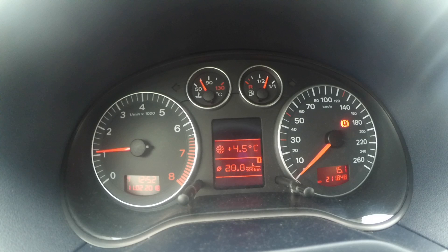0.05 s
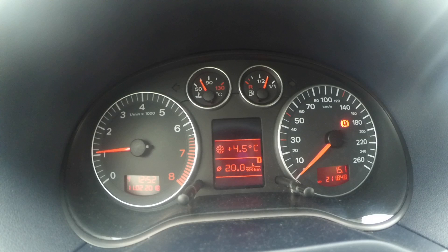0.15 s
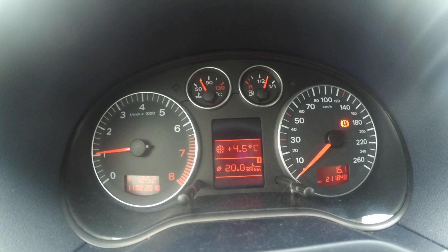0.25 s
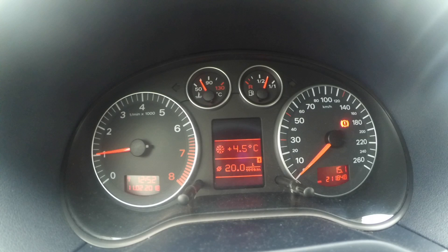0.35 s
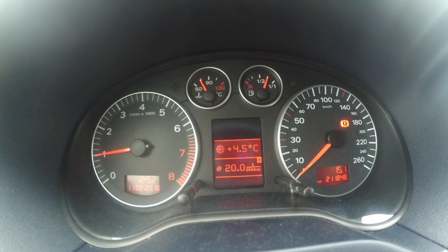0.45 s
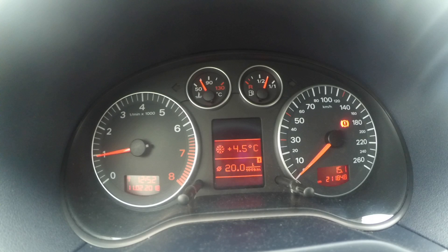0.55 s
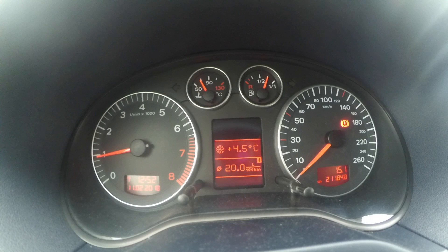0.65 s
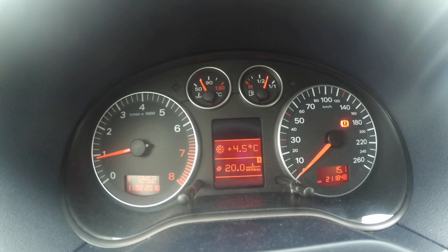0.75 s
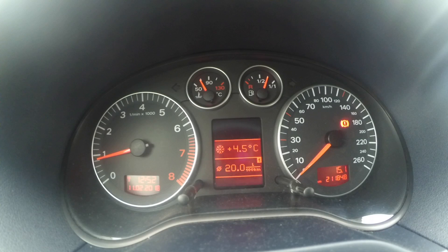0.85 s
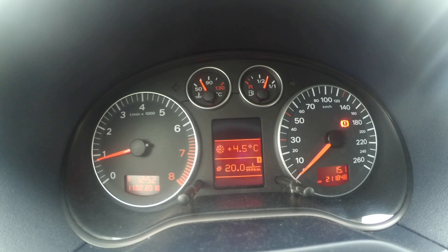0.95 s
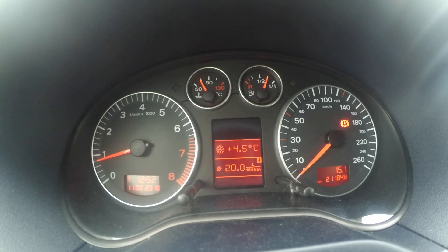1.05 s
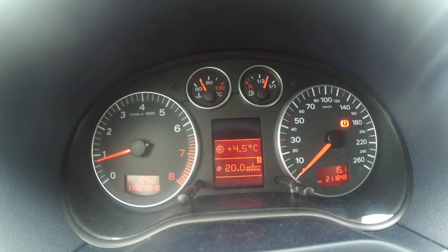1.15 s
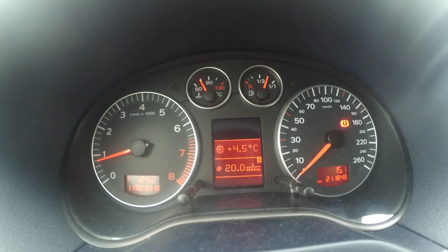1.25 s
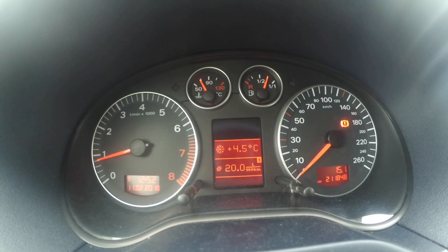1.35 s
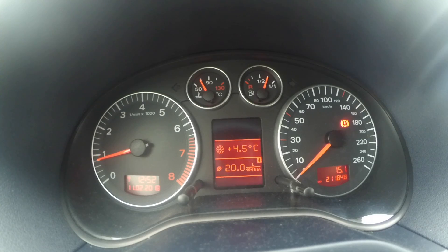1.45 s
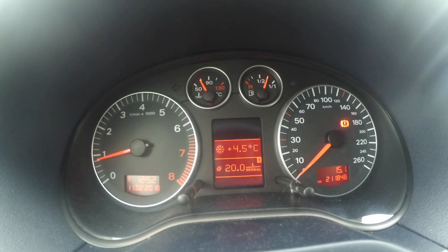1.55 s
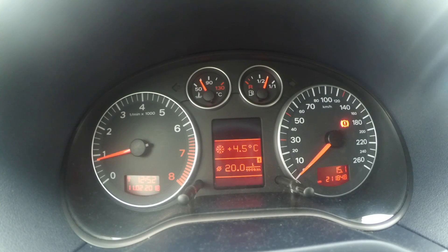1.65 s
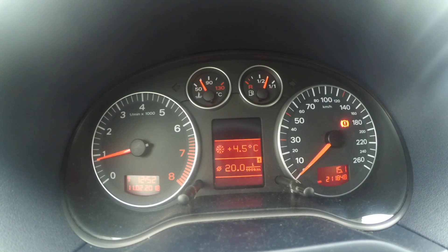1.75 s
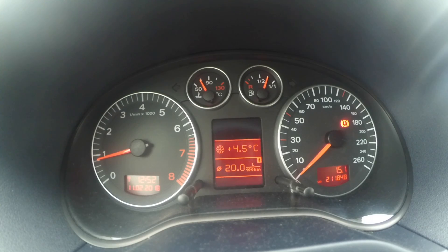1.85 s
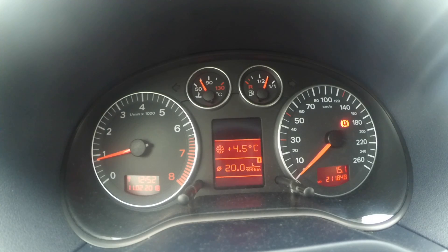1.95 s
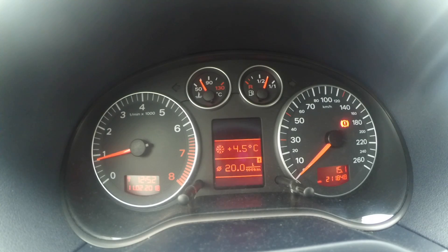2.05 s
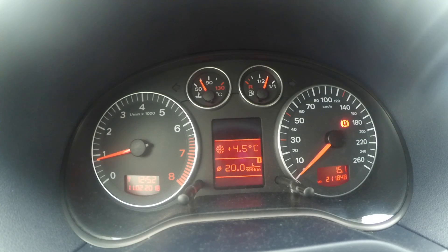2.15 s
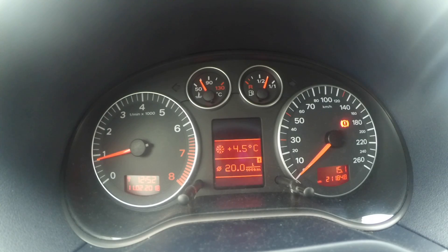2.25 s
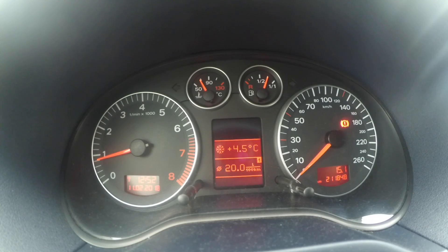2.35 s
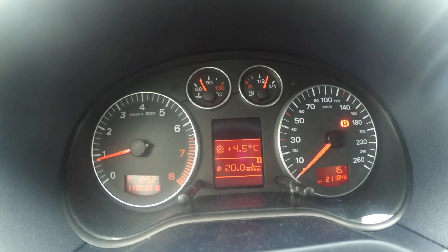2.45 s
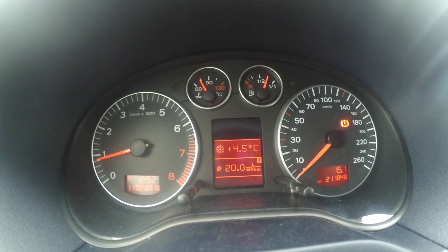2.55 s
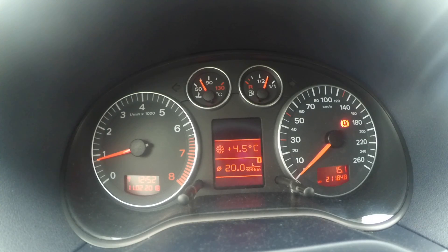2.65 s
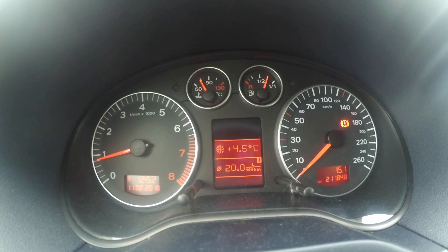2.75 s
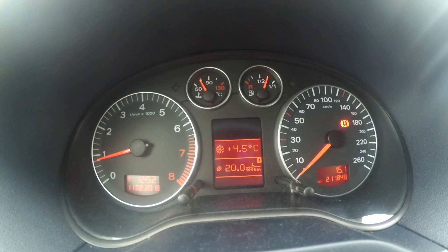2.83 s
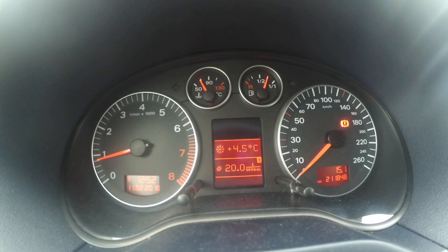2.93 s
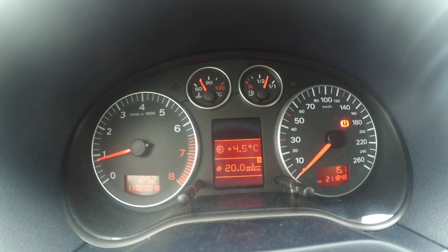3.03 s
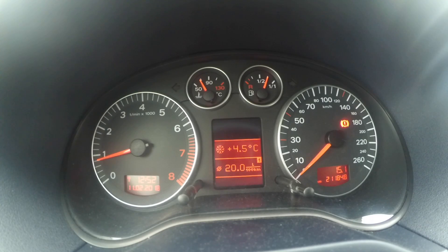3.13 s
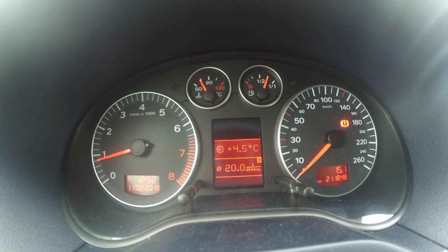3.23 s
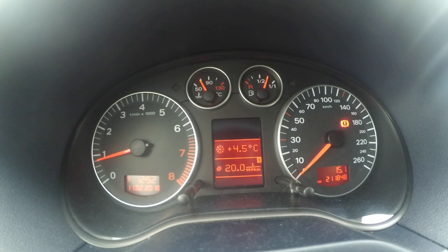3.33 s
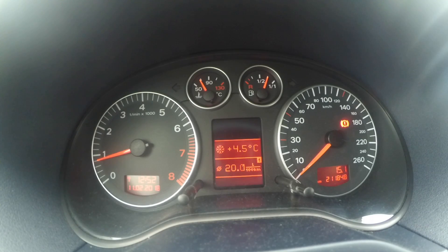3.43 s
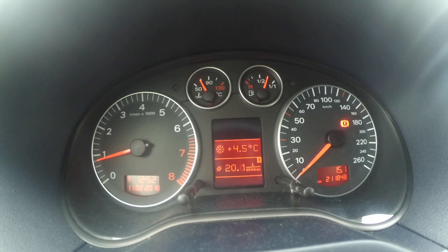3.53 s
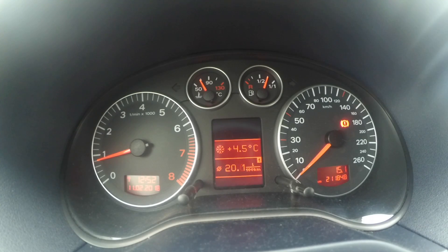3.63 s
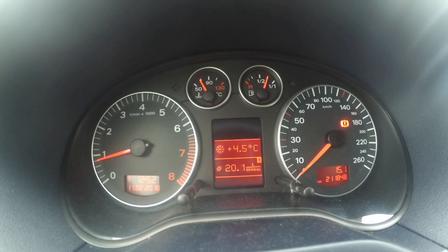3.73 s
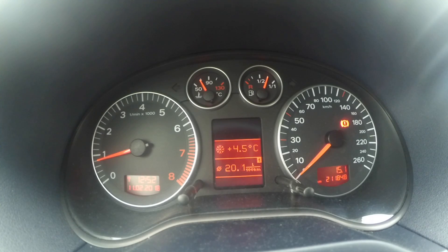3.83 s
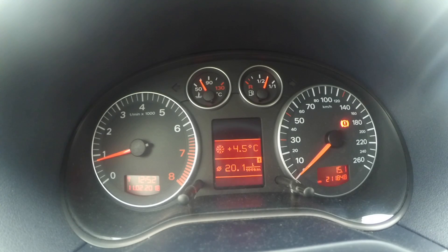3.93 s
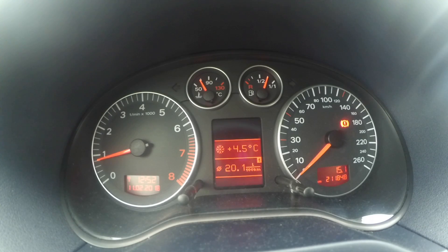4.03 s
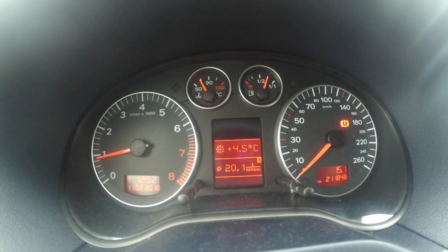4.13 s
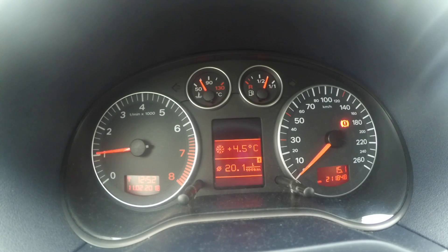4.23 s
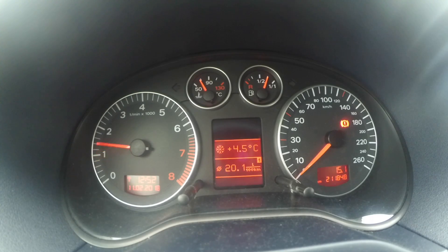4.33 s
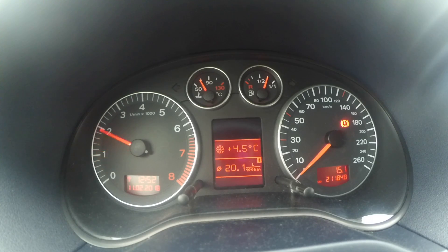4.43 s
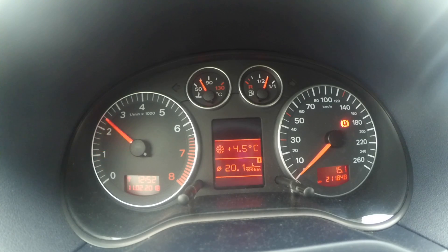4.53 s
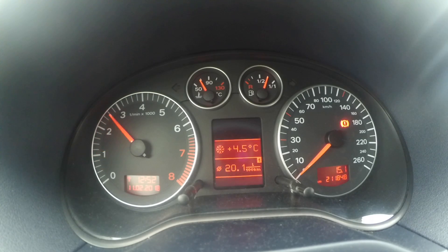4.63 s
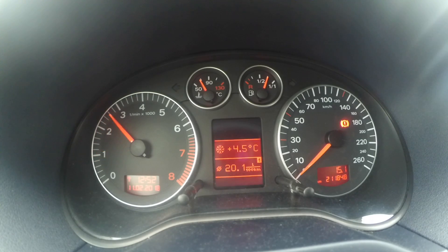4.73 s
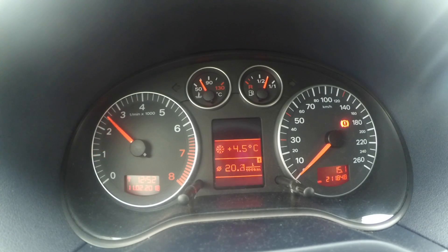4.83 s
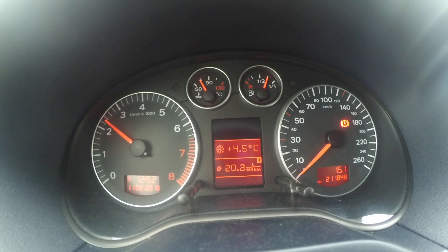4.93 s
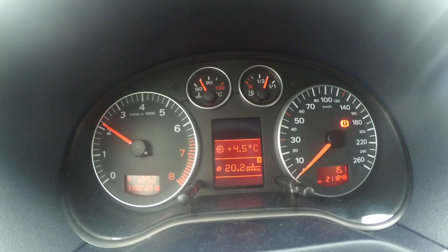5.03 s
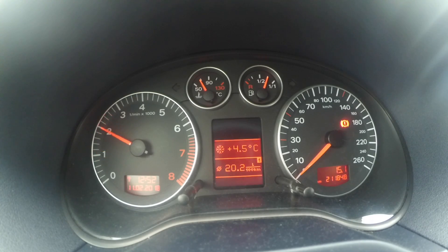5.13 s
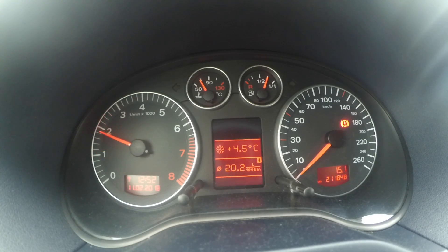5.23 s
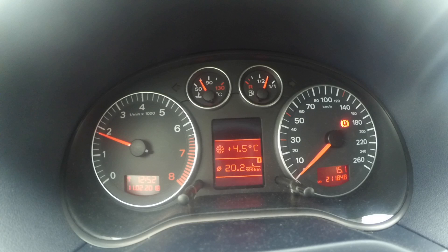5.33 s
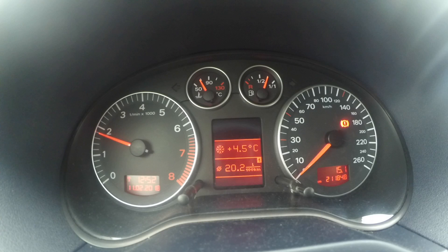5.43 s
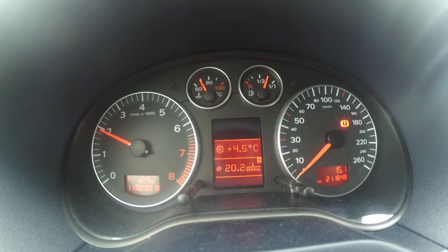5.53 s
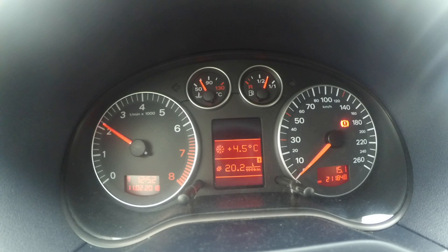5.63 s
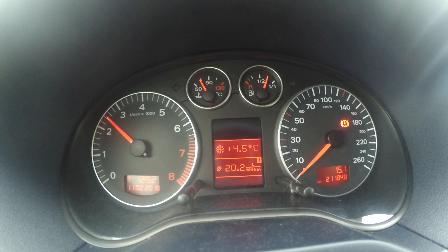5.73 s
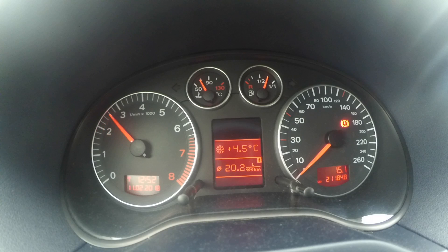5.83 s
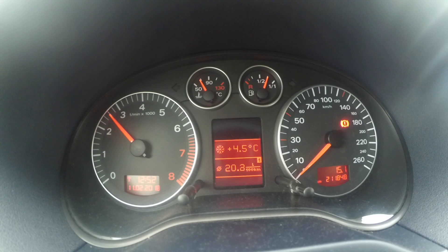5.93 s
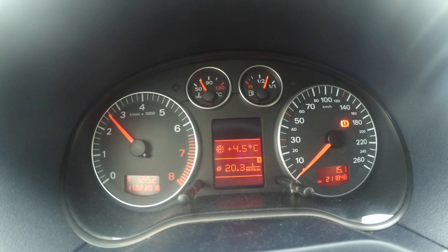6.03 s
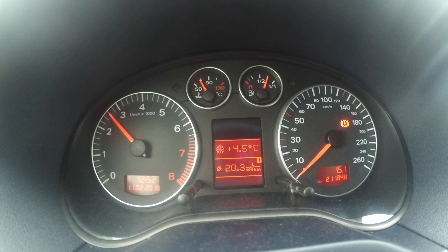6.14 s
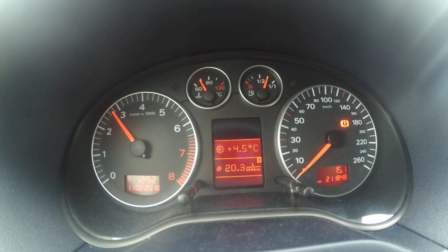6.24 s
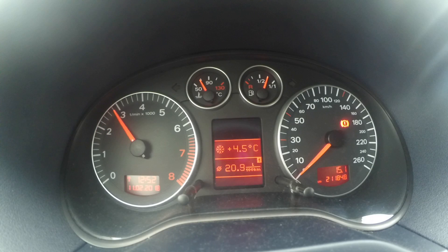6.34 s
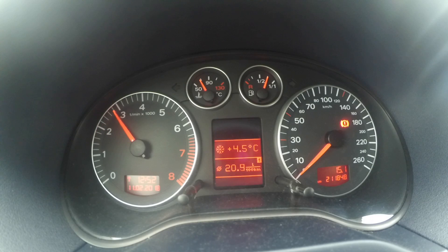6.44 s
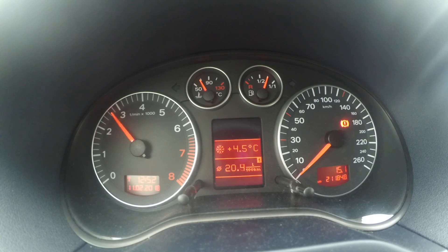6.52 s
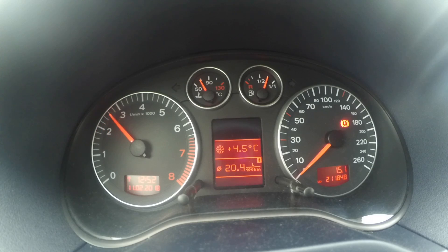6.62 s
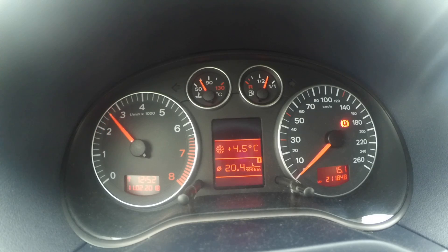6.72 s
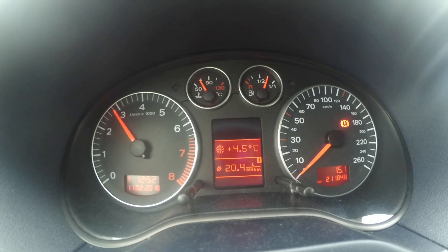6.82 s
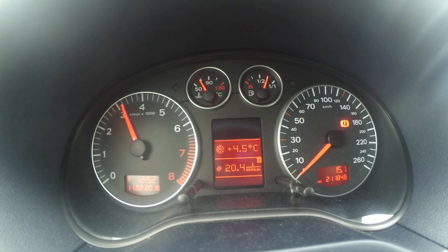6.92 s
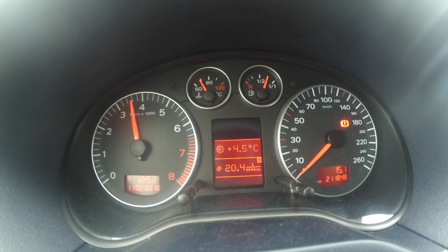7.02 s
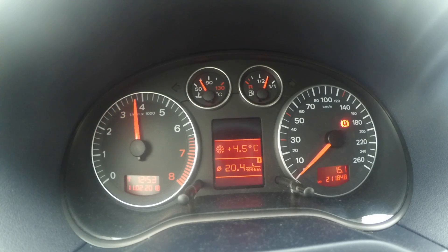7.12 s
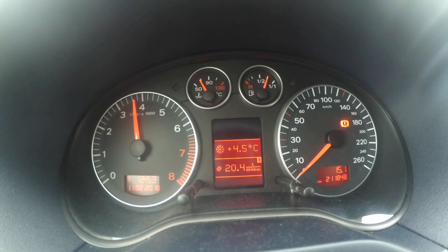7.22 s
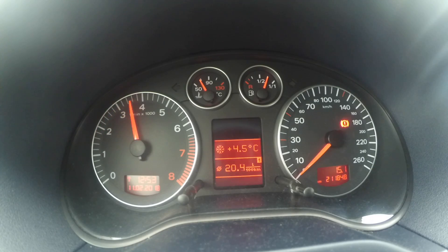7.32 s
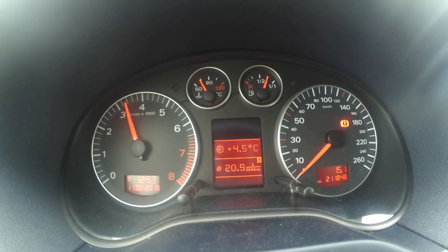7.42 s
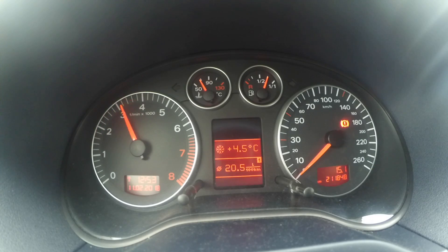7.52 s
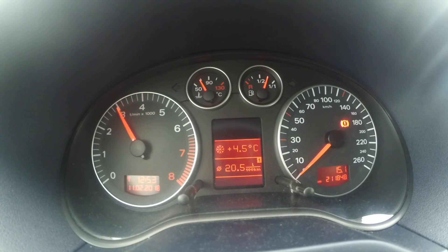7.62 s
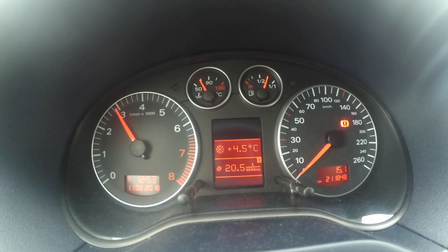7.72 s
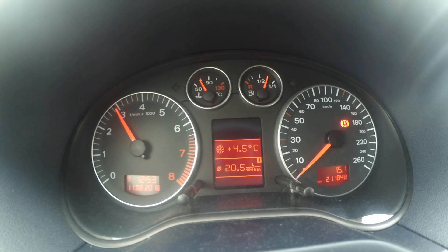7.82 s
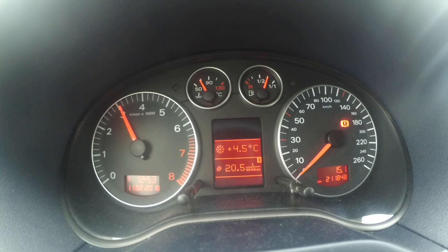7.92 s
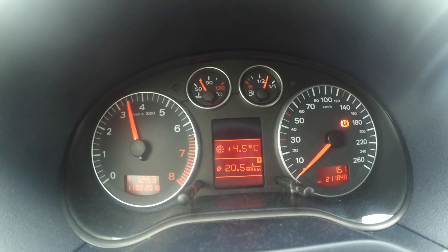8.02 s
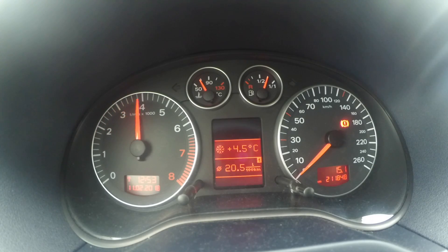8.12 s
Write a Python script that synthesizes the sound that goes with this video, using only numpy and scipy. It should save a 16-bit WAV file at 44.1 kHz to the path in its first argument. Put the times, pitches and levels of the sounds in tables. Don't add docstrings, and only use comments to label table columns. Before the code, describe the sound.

Muffled cabin sound of a four-cylinder engine calming from a clattery start, with small seat creaks and knocks, then revved repeatedly with plastic pedal clicks.

```python
import sys
import numpy as np
from scipy import signal
from scipy.fft import rfft, irfft, next_fast_len
from scipy.io import wavfile
from scipy.ndimage import uniform_filter1d, map_coordinates

SR = 44100
rng = np.random.default_rng(int(sys.argv[2]) if len(sys.argv) > 2 else 0)


def unload_audio(sound):
    columns = np.transpose(np.atleast_2d(sound))
    steps = np.round(np.clip(columns, -1, 1) * 32767)
    wavfile.write(sys.argv[1], SR, steps.astype(np.int16))


def how_loud(loudness_db):
    steps = np.asarray(loudness_db, float) / 20
    return 10 ** steps


N = 360363

# pitch_hz, level_db (per Hz)
HISS_COLOUR = [(290, -31.5), (500, -3.5), (561, -7), (677, -3.5), (971, -7.5), (1150, -2.5), (1370, -8),
               (2000, -13), (2550, -12.5), (2950, -15), (5640, -19.5), (9340, -19.5), (11400, -18.5),
               (15700, -23.5)]
# pitch_hz, width_hz, level_db
CIRCUIT_WHISTLES = [(11300, 250, 0), (12300, 60, 2)]
# pitch_hz, level_db
PUMP_TONES = [(71.3, -64), (142, -66)]
# time_s, level_db
COAT_RUSTLE = [
    (0, -79),
    (.55, -77),
    (.8, -66),
    (.92, -65.5),
    (1.2, -69.5),
    (1.28, -75),
    (1.45, -74.5),
    (2.15, -84.5),
    (2.4, -104),
]
# pitch_hz, level_db (per Hz)
CLOTH_COLOUR = [(410, -27), (700, -6.5), (1160, -6), (1500, -8), (1830, -7), (3110, -11), (3490, -9),
                (4300, -12.5), (11200, -13.5), (15500, -20.5)]
# pitch_hz, width_hz, level_db
SLEEVE_HOLLOWS = [(1830, 76, 4.5), (3870, 120, 8.5)]
# time_s, level_db
SEAT_CREAK = [
    (0.13, -78),
    (0.142, -76),
    (0.182, -58.5),
    (0.24, -54),
    (0.27, -96),
]
# pitch_hz, width_hz, level_db
SEAT_COVER = [(672, 17, 2), (910, 30, 0), (1380, 67, -10.5), (1960, 39, -17), (2123, 31, -13.5),
              (2670, 51, -20.5), (3120, 32, -22), (3480, 17, -21)]
# start_s, peak_db, pitch_hz, edge_db, brightness_db
TRIM_TICKS = [(0.503, -56.5, 614, -21, -3.5), (0.774, -52, 627, -18, -6.5), (0.964, -50, 2070, 0, 2),
              (0.972, -44.5, 2070, -0.5, -4.5), (1.213, -41.5, 890, -18, -2.5),
              (1.666, -42.5, 1270, -34, -31), (2.745, -49, 690, -57, -40), (2.945, -61, 1160, -36, -24),
              (2.965, -58, 1160, -33, -24), (3.598, -50.5, 694, -32, -21), (4.117, -54, 1093, -37.5, -25),
              (4.491, -51.5, 641, -24, -20.5), (4.887, -45, 880, -47, -47), (4.994, -51.5, 1070, -35, -31),
              (6.285, -38, 926, -22.5, -36)]
# start_s, peak_db, frame_hz, shell_hz, shell_db
SEAT_KNOCKS = [(0.199, -34.5, 228, 231, -25), (0.24, -32, 183, 244, -14), (0.488, -29.5, 123.4, 303, -12),
               (0.763, -40, 222, 259, 3.5), (0.826, -37, 223, 373, 4.5), (1.147, -37.5, 216, 361, 2),
               (1.22, -27.5, 78.4, 383, -11.5), (1.246, -30, 80.6, 250, -9.5),
               (1.665, -29, 149.4, 300, -11), (2.333, -47.5, 111, 301, 9), (2.743, -45, 106, 380, 8.5),
               (3.594, -37, 182, 240, -0.5), (3.933, -40.5, 92, 327, 5.5)]
# start_s, peak_db, brightness_db, heel_hz, ring_db
PEDAL_HITS = [
    (4.385, -21.5, -18, 963, -3.5),
    (5.641, -26.5, -17.5, 1380, -3.5),
    (6.153, -20.5, -15.5, 950, -2),
    (6.886, -21, -14, 1380, -1),
    (8.007, -18, -13.5, 1410, -6),
]
# pitch_hz, width_hz, level_db
PEDAL_RING = [(670, 5.7, 1.5), (740, 32, -2), (910, 88, -5.5), (1070, 55, -7), (1612, 40, -2.5),
              (1870, 64, -3), (2346, 100, -8), (3370, 120, -7.5), (3940, 270, -10), (4330, 150, -8.5),
              (6560, 250, -16)]
# pitch_hz, level_db (per Hz)
SNAP_COLOUR = [(290, -35.5), (500, -5.5), (1560, -4.5), (1750, -18.5), (1900, -4), (2840, -17.5),
               (3330, -10), (4980, -17.5), (10500, -20.5), (15500, -39)]
# time_s, rate_hz (firings per second)
COLD_IDLE = [
    (0, 35.9),
    (.93, 25.2),
    (1.45, 27.7),
    (2.05, 27.4),
    (3.2, 26.1),
    (3.98, 26.2),
    (4.09, 28),
]
# time_s, rate_hz (firings per second), boom_swell_db
REVS = [(4.2, 41.12, -3), (4.39, 83.83, -1), (4.53, 94.02, 1.5), (5.16, 57.32, 0), (5.401, 60.5, -5.5),
        (5.71, 94.6, -3.5), (5.92, 80.32, -1), (6.251, 97.6, 0), (6.498, 81.12, 0), (6.81, 97.17, -2.5),
        (6.93, 128.1, -2), (7.08, 129.6, 4.5), (7.239, 113, -1), (7.37, 110, 2.5), (7.582, 92.3, -0.5),
        (7.888, 103.2, -0.5), (8.001, 128, 1.5), (8.17, 134, -12)]
CYLINDER_STRENGTH = [-2, 2.5, -7.3, -1.5]
TONE_MULTIPLES = [.5, 1, 1.5, 2, 3, 4, 5, 6, 7, 8, 9.5, 2.5, 3.5]
# rest_db, octave_db (per octave of speed), throttle_db (fully open), unsteady_db
TONE_GROWTH = [(-81, 11.5, 0.5, 4), (-62.5, 12.5, 2, 2), (-81.5, 9, 2.5, 11.5), (-67, 4.5, 9, 1),
               (-75, 6.5, 5.5, 3.5), (-61, 3.5, 5, 3), (-77, 4, 3, 5), (-74.5, 5, 3.5, 4.5),
               (-78, 1, 1.5, 5.5), (-74, .5, 5, 1.5), (-75, 5, -1.8, 2.5), (-86, 12, 8.5, 6.5),
               (-86.5, 10, 4, -0.5)]
# pitch_hz, level_db
DEEP_GAIN = [(27, -5), (45, 8.5), (58, 12.5), (64, 12), (69.5, -1), (75, 7), (80, 13)]
# pitch_hz, level_db
BOOM_GAIN = [(85, 9), (91, 14), (100, 12), (110, 5), (120, 11), (127, 16.5), (133, 12), (143, 6)]
# pitch_hz, level_db
OVERTONE_GAIN = [(175, 8), (206, 4.5), (219, 14), (236, -3.5), (263, 8.5), (292, 3.5), (400, 0.5),
                 (700, -41)]
# rate_hz, level_db
THROTTLE_GAIN = [(50, 0.5), (76, 7), (88, -6), (101, -6), (116, 4), (130, -1)]
# pitch_hz, width_hz, level_db
CABIN = [(107, 63, 3.5), (149.5, 29, 5), (224.2, 6.9, -2), (258.6, 38, -4.5), (339.4, 30, 1),
         (415, 17, -9.5)]
# pitch_hz, level_db (per Hz)
DRONE_COLOUR = [(24, -39.5), (40, -6.5), (120, -1), (199, -14), (408, -12.5), (525, -34.5), (700, -45),
                (910, -51.5), (1540, -120)]
# pitch_hz, width_hz, level_db
DASH_PANEL = [(263.3, 11.5, 2.5), (271, 27.7, -5)]
# pitch_hz, level_db (per Hz)
VALVE_COLOUR = [(260, -22.5), (450, 6), (541, -24), (621, -11), (994, -14), (1140, -11), (1390, -21.5),
                (2350, -26), (2640, -23), (4130, -36.5), (7000, -50.5), (9100, -73.5), (15400, -120)]
# pitch_hz, width_hz, level_db
BULKHEAD = [(654, 38, -4), (860, 43, 1.5), (1070, 23, -8.5), (1600, 170, -1), (2600, 210, -14.5)]

HISS_DB, TOP_HZ = -73.5, 15800
TICK_S, KNOCK_S = 0.026, 0.13
BOUNCE_S, BOUNCE_DB = .0185, -10
FLYWHEEL_S, IDLE_HZ = .07, 27
COAST, FULL, STAB = 17, 65, 206
LAG_S, LEAD_S = 0.04, 0.03
RING_UP_S = 0.14
FLUTTER = 15
BOOM_SHARE = 0.35
COLD_DB, COLD_S = 7, 0.4
BELT_COLD_DB, LEAN_DB = 12, 4.5
BARK_DB = 4
# dB at rest, dB per octave of speed, dB at full effort
GROWL, CLATTER = (-63.5, 7.77, 8.8), (-78, 12.2, 1.5)
HUM, DRONE = (-72.5, 12.5, 8.6), (-59, 7.54, 4.7)


def unit(x):
    return x / np.sqrt(np.mean(x ** 2) + 1e-20)


def curves(rows, silent=None):
    s, *cols = np.transpose(rows)
    return [np.interp(np.arange(N) / SR, s, c, silent, silent) for c in cols]


def steady(x, span):
    return x / np.sqrt(np.abs(uniform_filter1d(x ** 2, int(span * SR))) + 1e-20)


def wobble(rate):
    knots = rng.standard_normal(int(N * rate / SR) + 4)
    return map_coordinates(knots, [np.arange(N) * rate / SR])


def filtered(x, response):
    m = next_fast_len(len(x) + 8192)
    return irfft(rfft(x, m) * response(np.fft.rfftfreq(m, 1 / SR)), m)[:len(x)]


def noise(spectrum, count=N):
    f, db = np.transpose(spectrum)
    colour = lambda hz: how_loud(np.interp(np.log(hz + 1), np.log(f), db))
    return unit(filtered(rng.standard_normal(count), colour))


def modes(table):
    def response(f):
        return sum((-1) ** k * how_loud(db) * 1j * f * w / (c * c - f * f + 1j * f * w)
                   for k, (c, w, db) in enumerate(table))
    return response


def ringing_noise(table):
    return filtered(rng.standard_normal(N), modes(table))


def add(out, s, x):
    part = out[round(s * SR):][:len(x)]
    part += x[:len(part)]


def microphone_hiss():
    hiss = noise(HISS_COLOUR) + 0.13 * unit(ringing_noise(CIRCUIT_WHISTLES))
    return how_loud(HISS_DB + 0.72) * hiss


def pump():
    t = np.arange(N) / SR
    drift = 3.1 * wobble(2.0)
    out = np.zeros(N)
    for hz, db in PUMP_TONES:
        out += how_loud(db + 3 * wobble(1)) * np.sin(2 * np.pi * hz * t + drift * hz / 71)
    return out


def coat():
    rub = noise(CLOTH_COLOUR) + 0.16 * unit(ringing_noise(SLEEVE_HOLLOWS))
    flutter = how_loud(.8 * wobble(30))
    return how_loud(curves(COAT_RUSTLE, -120)[0] + 3.5) * flutter * rub


def seat_creak():
    cover = modes(SEAT_COVER)
    response = lambda f: cover(f) + 0.13 / (1 + (f / 2500) ** 4) * (f > 400)
    slips = steady(filtered(rng.standard_normal(N) * how_loud(2.5 * wobble(200)), response), .02)
    return how_loud(curves(SEAT_CREAK, -120)[0]) * slips


def trim_ticks():
    out, t = np.zeros(N), np.arange(SR // 3) / SR
    for s, db, hz, edge_db, bright_db in TRIM_TICKS:
        colour = [(200, -15), (450, -3), (hz, 0), (3800, edge_db + 2.5), (6000, bright_db - 10.0),
                  (11000, bright_db - 6.5), (16000, bright_db - 20.5)]
        body = steady(noise(colour, count=len(t)), 0.002)
        fade = how_loud(db - 3.5 - 24.6 * (t / TICK_S) ** 1.07)
        add(out, s, fade * (1 - np.exp(-t / 0.00084)) * body)
    return out


def seat_knocks():
    out, t = np.zeros(N), np.arange(SR // 3) / SR
    for s, db, frame_hz, shell_hz, shell_db in SEAT_KNOCKS:
        puff = noise([(60, -1), (200, 6), (400, 0.0), (900, -30), (1500, -42.5)], count=len(t))
        shell = how_loud(shell_db - 30 * t / KNOCK_S) * (np.sin(2 * np.pi * shell_hz * t) + 0.84 * puff)
        frame = np.sin(2 * np.pi * frame_hz * t)
        fade = how_loud(db - 7.5 - 40 * t / KNOCK_S)
        add(out, s - .003, fade * (1 - np.exp(-t / 0.0024)) * (frame + shell))
    return out


def pedal():
    out, t = np.zeros(N), np.arange(SR // 4) / SR
    lead = SR // 16
    after = t - lead / SR
    for s, db, bright_db, heel_hz, ring_db in PEDAL_HITS:
        blows = how_loud(-33 + 130 * after) * (after < 0)
        blows = blows + how_loud(-13 - 60 * after / 0.15) * (after > 0)
        spring = blows.copy()
        for k in range(5):
            u = np.clip(after - k * BOUNCE_S + 0.0026 * (k > 0), 0, None)
            contact = how_loud(-9 * (u / 0.0088) ** 2) * (1 - np.exp(-u / 0.00074))
            blows = blows + how_loud(k * BOUNCE_DB) * contact
            spring = spring + how_loud(0.63 * k * BOUNCE_DB - 1.3 * (k == 0)) * contact
        air = noise(SNAP_COLOUR, count=len(t))
        high = filtered(air, lambda f: f ** 4 / (f ** 4 + 4400.0 ** 4))
        struck = [(heel_hz, 60, -1.5)]
        struck += [(hz, w, level + rng.normal(0, 1.5)) for hz, w, level in PEDAL_RING]
        ring = filtered(blows * rng.standard_normal(len(t)), modes(struck))
        puff = how_loud(-10) * blows * (air - high) + how_loud(bright_db - 3.0) * spring * unit(high)
        add(out, s - lead / SR, how_loud(db) * (puff + how_loud(ring_db) * ring / np.abs(ring).max()))
    return out


def motion():
    rows = [(s, hz, 0) for s, hz in COLD_IDLE] + REVS
    hz, swell_db = (uniform_filter1d(c, int(FLYWHEEL_S * SR), mode='nearest') for c in curves(rows))
    now = np.arange(N) / SR
    push = np.interp(now + LEAD_S, now, np.clip(np.gradient(hz) * SR + COAST, 0, None))
    keep = np.exp(-1 / (LAG_S * SR))
    opened, shove = signal.lfilter([1 - keep], [1, -keep], [1 - np.exp(-push / FULL), push / STAB])
    return hz, swell_db, opened, shove


def grown(rule, hz, effort):
    rest_db, octave_db, throttle_db = rule
    return rest_db + octave_db * np.log2(hz / IDLE_HZ) + throttle_db * effort


def firing_tones(hz, turns, swell_db, opened, shove, cold):
    cabin_hz, cabin_db = np.transpose(DEEP_GAIN + BOOM_GAIN + OVERTONE_GAIN)
    swell_db = swell_db + opened * np.interp(hz, *np.transpose(THROTTLE_GAIN))
    tones = np.zeros(N)
    for k, (*rule, unsteady_db) in zip(TONE_MULTIPLES, TONE_GROWTH):
        weak = (k * hz < BOOM_GAIN[-1][0]) & (k not in (1, 2))
        gain_db = np.where(weak, BOOM_SHARE, 1) * np.interp(k * hz, cabin_hz, cabin_db)
        db = grown(rule, hz, opened)
        db += uniform_filter1d(gain_db, size=900 if k == 1 else int(RING_UP_S * SR))
        db += unsteady_db * wobble(FLUTTER if 2 < k < 8 else 5)
        db += swell_db * (k == 1) + BARK_DB * shove * (k == 2)
        db += cold * (BELT_COLD_DB * (k > 9) - LEAN_DB * (k in (2, 4)))
        tones += np.sqrt(2) * how_loud(db) * np.sin(2 * np.pi * k * turns + k * k)
    return tones


def cabin_growl(hz, turns, beat, growl_db):
    fired = np.flatnonzero(np.diff(np.floor(turns)))
    pulses = np.zeros(N)
    scatter_db = 6.5 * rng.standard_normal(len(fired))
    pulses[fired] = how_loud(np.resize(CYLINDER_STRENGTH, len(fired)) + scatter_db)
    rough = .5 + hz / 90
    shake = steady(pulses, 0.12) + rough * steady(beat * rng.standard_normal(N), 0.065)
    cabin = modes(CABIN)
    walls = lambda f: cabin(f) / (1 + (f / 520) ** 5) * (f / 95) ** 4 / (1 + (f / 95) ** 4)
    return how_loud(growl_db + 1.5) * steady(filtered(shake, walls), 0.45)


def body_drone(hz, shove):
    return how_loud(grown(DRONE, hz, shove) + 2.5 * wobble(5.4)) * noise(DRONE_COLOUR)


def intake_roar(growl_db):
    colour = [(250, -30.5), (350, -4), (480, -0.5), (700, -5.5), (1000, -12), (1500, -40.5)]
    return how_loud(growl_db - 12.0) * noise(colour)


def panel_hum(hz, opened):
    panel_db = grown(HUM, hz, opened) + 3 * wobble(3.5)
    return how_loud(panel_db + 1.5) * steady(ringing_noise(DASH_PANEL), 0.049)


def valve_clatter(hz, shove, beat, cold):
    gear_db = grown(CLATTER, hz, shove) + COLD_DB * cold
    clatter = noise(VALVE_COLOUR) + 0.18 * unit(ringing_noise(BULKHEAD))
    return how_loud(gear_db + 2.5 + 0.55 * wobble(18.0)) * steady(clatter * (4.5 + beat), 0.038)


def engine():
    hz, swell_db, opened, shove = motion()
    cold = np.exp(-np.arange(N) / (SR * COLD_S))
    turns = np.cumsum(hz) / SR
    beat = np.exp(-2.5 * (turns % 1))
    growl_db = grown(GROWL, hz, shove)
    tones = firing_tones(hz, turns, swell_db, opened, shove, cold)
    growl = cabin_growl(hz, turns, beat, growl_db)
    drone = body_drone(hz, shove) + intake_roar(growl_db)
    return tones + growl + drone + panel_hum(hz, opened) + valve_clatter(hz, shove, beat, cold)


def scene():
    small_moves = coat() + seat_creak() + trim_ticks() + seat_knocks()
    return (pump() + small_moves + pedal() + engine())[None]


def top_cut(x):
    return signal.sosfilt(signal.butter(12, 16370, fs=SR, output="sos"), x)


def record(dry):
    mix = filtered(dry[0] + microphone_hiss(), lambda f: f < TOP_HZ) - .0019
    return top_cut(mix[None])


dry = scene()
out = record(dry)
unload_audio(out)
```